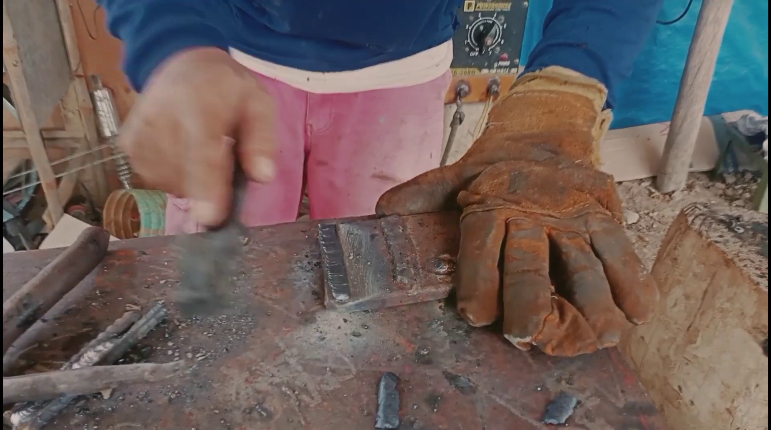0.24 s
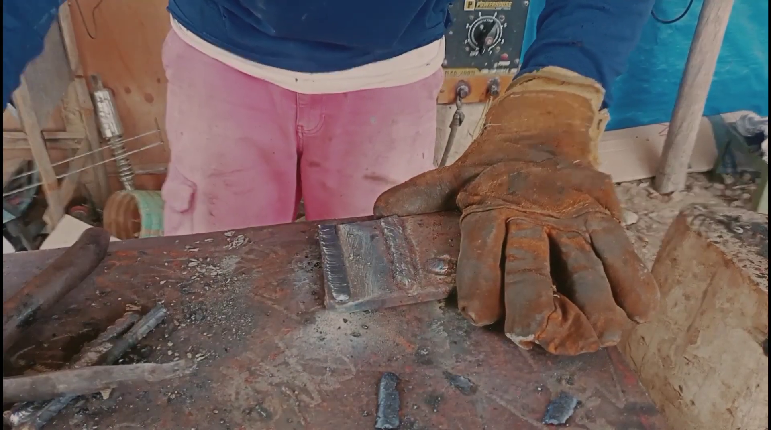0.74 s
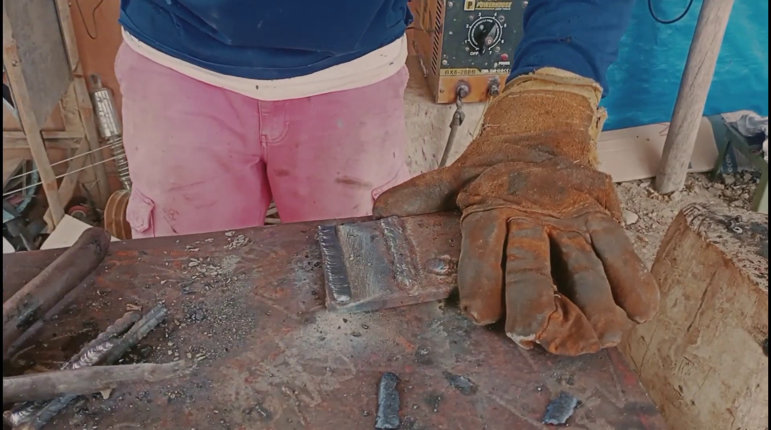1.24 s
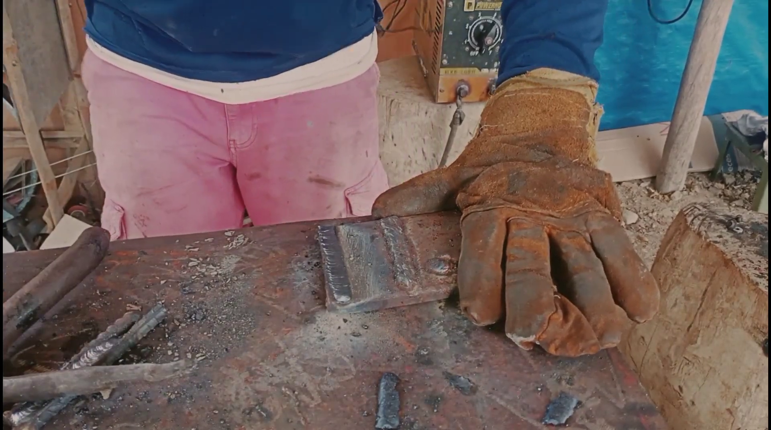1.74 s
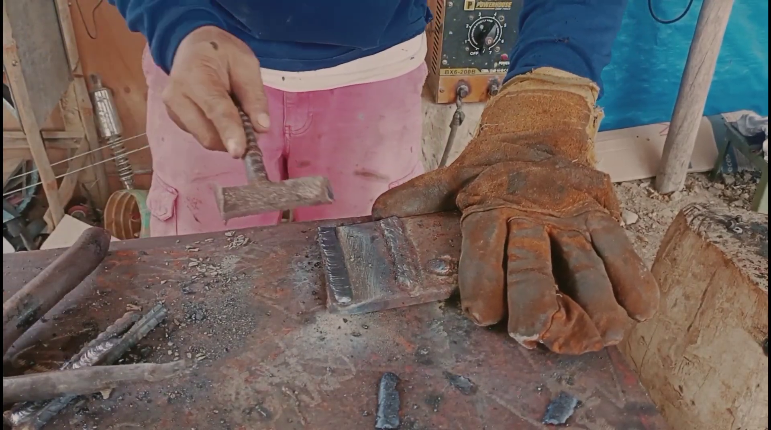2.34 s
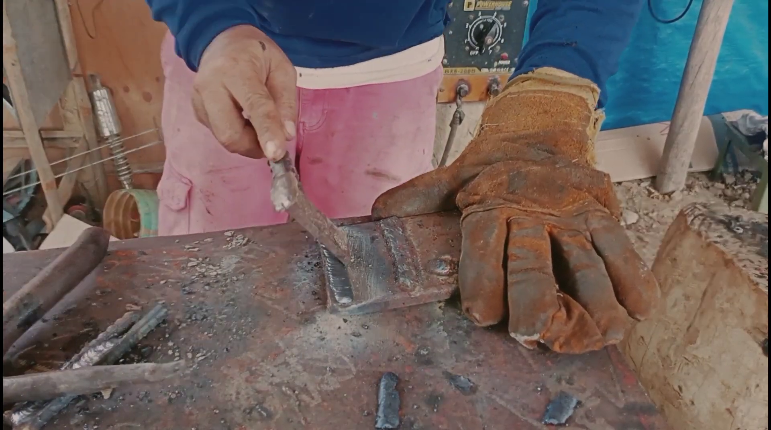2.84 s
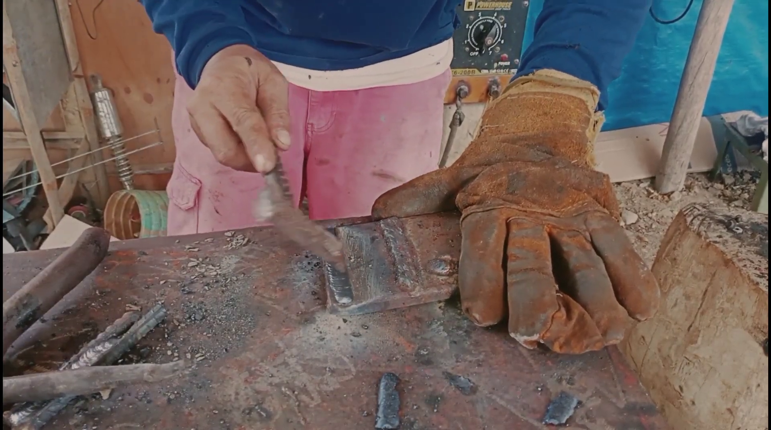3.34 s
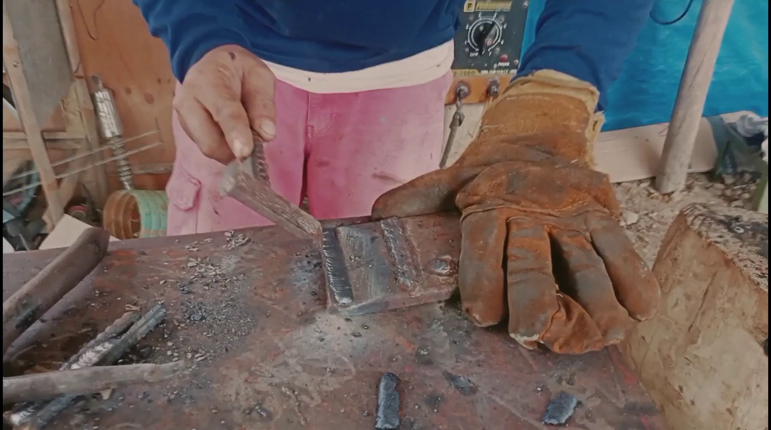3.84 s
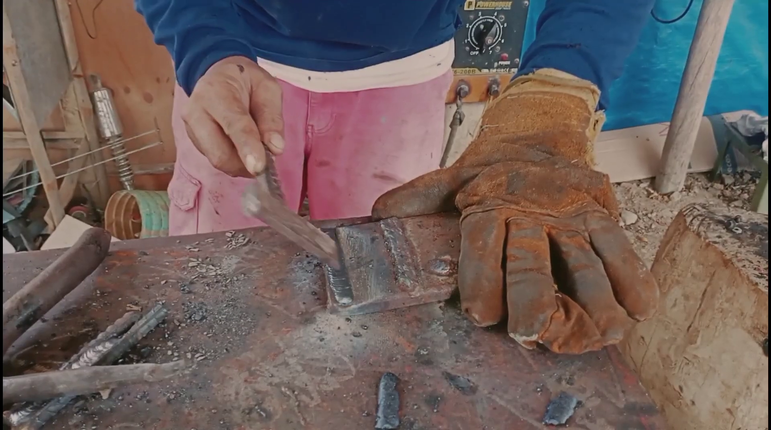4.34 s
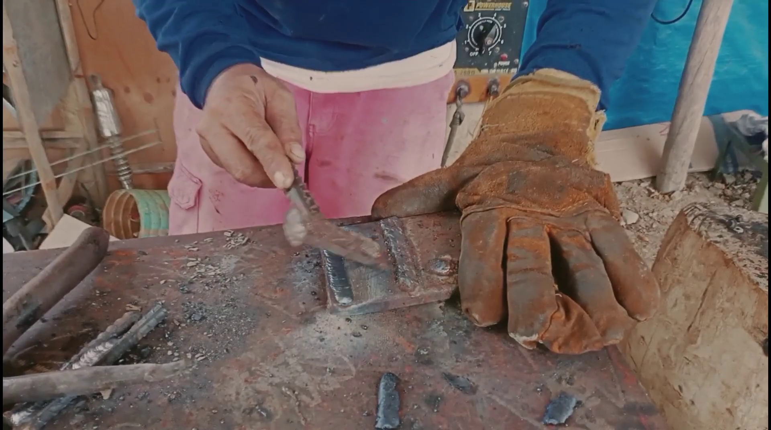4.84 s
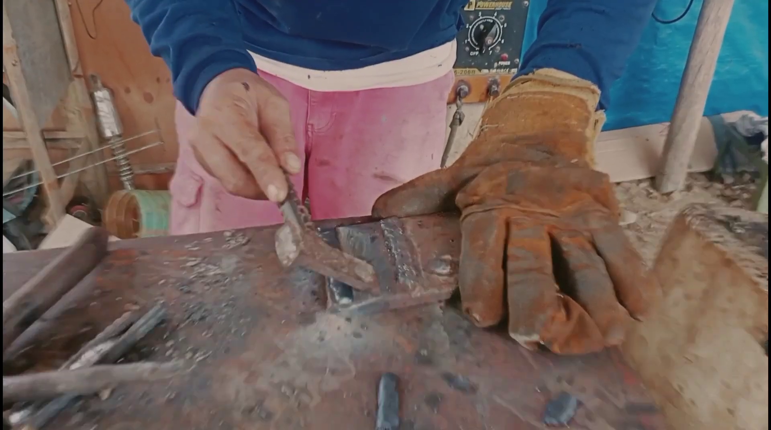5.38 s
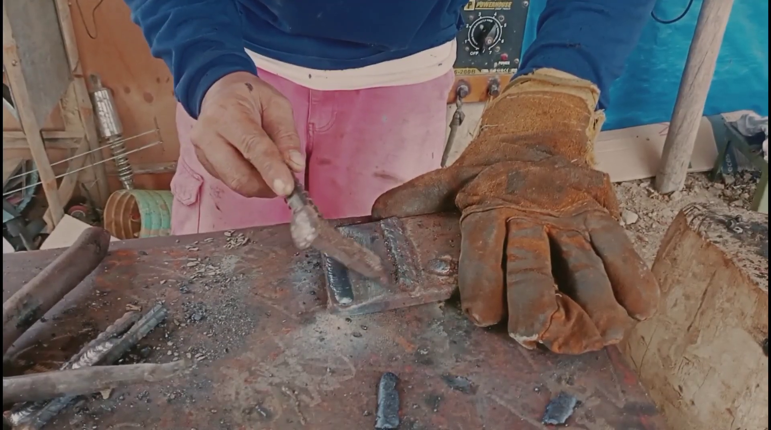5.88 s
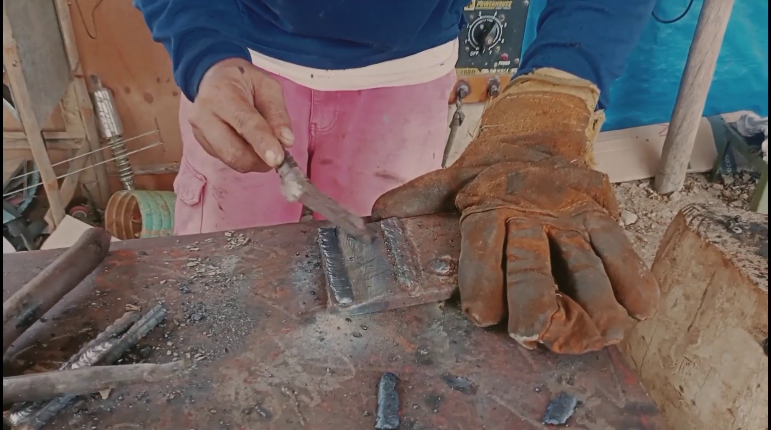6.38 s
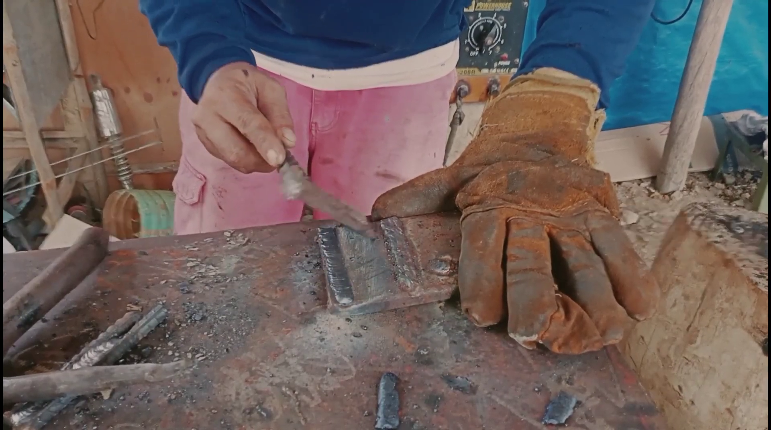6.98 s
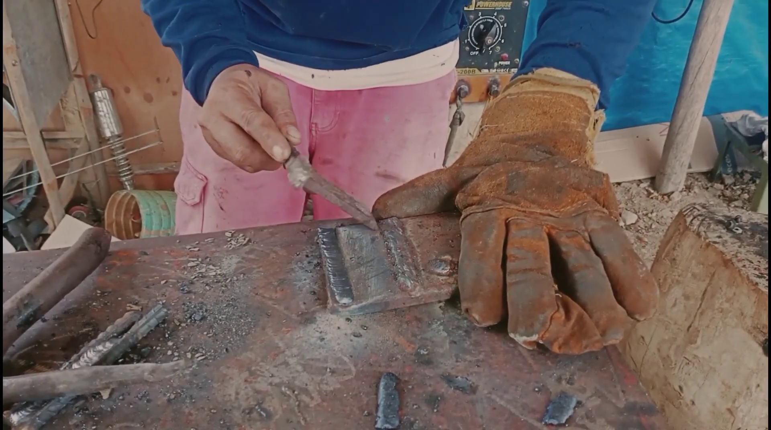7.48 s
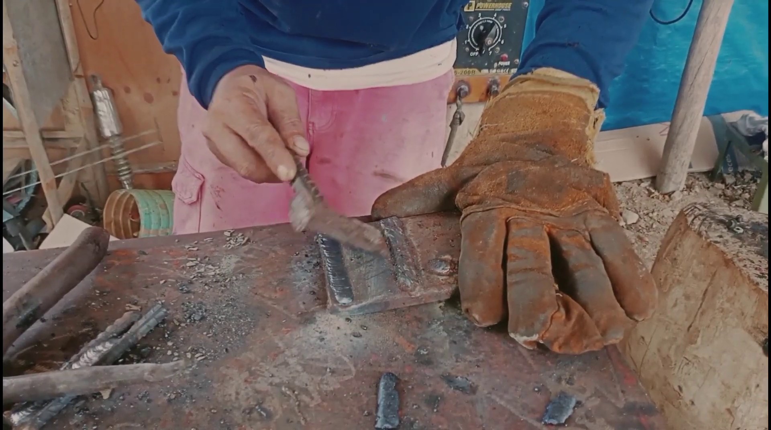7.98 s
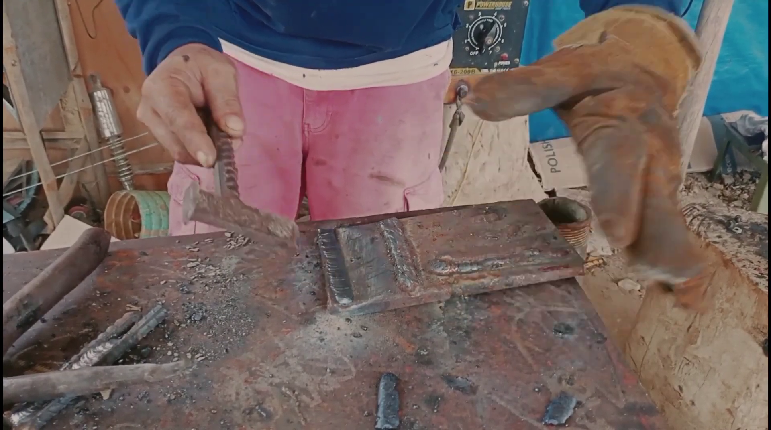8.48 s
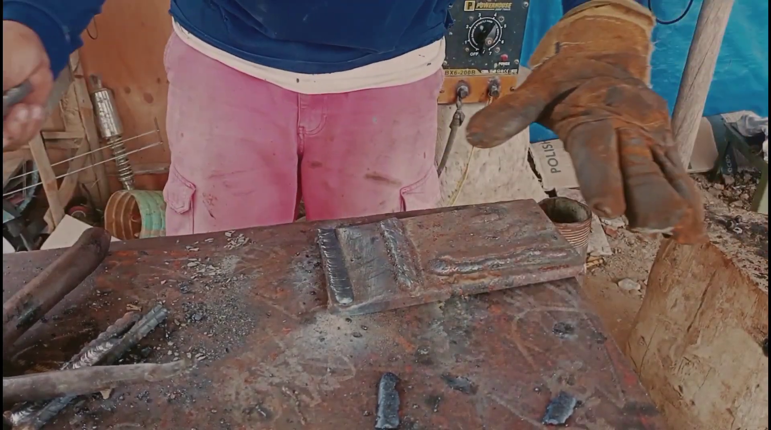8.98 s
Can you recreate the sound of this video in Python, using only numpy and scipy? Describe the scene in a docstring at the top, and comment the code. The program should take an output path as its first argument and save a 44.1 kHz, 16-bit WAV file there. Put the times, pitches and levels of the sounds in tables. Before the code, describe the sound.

A small hammer chips slag off a welded steel plate with bright short ringing taps and gritty scrapes, over a low workshop hum.

```python
"""An open workshop: a chipping hammer taps slag off a weld on a steel plate on a bench, then picks and scrapes.
Each blow rings the head's modes in two bending planes over a dead plate clack and a crack of slag, both noise bursts.
Random stick-slip jolts drive the scrapes and slides; damped knocks set tools down before and turn the plate after.
Behind lie a low wavering hum, coloured-noise air and faint falling bird whistles, all in mono."""
import sys
import numpy as np
from scipy import signal
from scipy.fft import rfft, irfft
from scipy.io import wavfile
from scipy.ndimage import uniform_filter1d, minimum_filter1d

SR = 44100
rng = np.random.default_rng(int(sys.argv[2]) if len(sys.argv) > 2 else 0)


def log_audio(samples):
    """Write samples as a 16-bit WAV file to the path given in sys.argv[1]."""
    # one column per channel
    frames = np.atleast_2d(samples).T
    # limit to full scale, then quantise
    limited = np.clip(frames, -1, 1)
    pcm = np.round(limited * 32767).astype(np.int16)
    wavfile.write(sys.argv[1], SR, pcm)


N = 406597
TIME = np.arange(N) / SR
AFTER = TIME[:SR * 3 // 5]  # seconds after a blow

# Hammer head bending modes. Each row: free pitch in Hz, relative level in dB, free t60 in seconds,
# share of sideways bending 0-1.
HEAD_MODES = [(2072.7, -1.5, 0.097, 0.02), (2119, -5.5, 0.043, 0), (2400, 0.5, 0.05, 1),
              (2474, -11.5, 0.045, .95), (2858, -17, 0.15, 0.26), (3180, -20, 0.17, 0.2),
              (3533, -14.5, 0.051, 0), (4280, -29, .08, 0.4), (4760, -22, 0.059, 0.9)]
# Hammer head high overtones. Each row: pitch in Hz, relative level in dB.
HEAD_OVERTONES = [(5265, -8), (5464, 0), (5937, -12), (6389, -4), (7218, -10), (8014, -11), (8340, -14),
                  (9520, -21), (9685, -19), (10720, -19), (11240, -17), (12500, -26), (14580, -16),
                  (14700, -20), (14900, -23), (15430, -23)]
# Colour of a dull bench knock. Each row: frequency in Hz, relative gain in dB.
KNOCK_COLOUR = [(70, -25), (140, -3), (210, 4), (270, -1.5), (370, 7.5), (520, 5.5), (750, 5), (1100, 1.5),
                (1700, -7.5), (2600, -26), (5000, -65)]


def amp(db):
    """Decibels to gain."""
    return 10 ** (np.asarray(db) / 20)


def unit(x):
    """Scale to rms 1."""
    return x / np.sqrt(np.mean(x ** 2))


def unit_hit(x):
    """Scale a blow as if its energy lay in 30 ms at rms 1."""
    return x / np.sqrt(np.sum(x ** 2) / (.03 * SR))


def add(out, start_s, x):
    """Mix x into out from start_s, or from 0 if that is negative."""
    i = max(int(start_s * SR), 0)
    out[i:i + len(x)] += x[:max(N - i, 0)]


def colour(x, points, size=2048):
    """Minimum-phase filter through the (Hz, dB) points, by folding the cepstrum."""
    hz, db = np.transpose(points)
    bin_hz = np.arange(size // 2 + 1) * SR / size
    outline_db = np.interp(np.log(bin_hz + 1), np.log(hz), db)
    cepstrum = irfft(np.log(amp(outline_db)))
    cepstrum[1:size // 2] *= 2
    cepstrum[size // 2 + 1:] = 0
    impulse = irfft(np.exp(rfft(cepstrum)))
    return signal.fftconvolve(x, impulse)[:len(x)]


def fade(t60_s):
    """Exponential decay after a blow, down 60 dB at t60_s."""
    return np.exp(-np.log(1000) * AFTER / t60_s)


def random_sign():
    """Random polarity of one mode."""
    return rng.choice([-1, 1])


def burst(points, t60_s, tick_db):
    """Contact tick on top of decaying noise, coloured together."""
    x = rng.standard_normal(len(AFTER)) * fade(t60_s)
    x[0] += amp(tick_db)
    return unit_hit(colour(x, points))


def walk(rate_hz):
    """Smooth random wander of rms 1: held random steps, averaged twice."""
    step = int(SR / rate_hz)
    held = np.repeat(rng.standard_normal(N // step + 1), step)
    smooth = uniform_filter1d(uniform_filter1d(held, step), step)
    return unit(smooth[:N])


def slips(rate_hz, spread_db):
    """Stick-slip: jolts at random times and polarities, a few much stronger."""
    size = amp(spread_db * np.minimum(rng.exponential(size=N), 4))
    return (rng.random(N) < rate_hz / SR) * size * rng.choice([-1, 1], N)


def strokes(rows, levels, pressure):
    """Summed stroke gains: the hand presses in, eases as it moves, then lifts off."""
    attack_s, sag_db_per_s, release_db_per_s = pressure
    gain = np.zeros(N)
    for (start_s, length_s, *_), level in zip(rows, levels):
        eased_db = sag_db_per_s * AFTER + release_db_per_s * np.maximum(AFTER - length_s, 0)
        add(gain, start_s, level * np.minimum(AFTER / attack_s, 1) * amp(-eased_db))
    return gain


def ring(x, hz, t60_s):
    """One decaying mode driven by x: a two-pole resonator with a zero at the top of the band."""
    pole = np.exp((2j * np.pi * hz - np.log(1000) / t60_s) / SR)
    return signal.lfilter([1, 1], [1, -2 * pole.real, abs(pole) ** 2], x)


def chatter(length_s, rebound_db, count=5):
    """Impulse of a blow and the few quick rebounds of the tip after it."""
    push = np.zeros(len(AFTER))
    push[0] = 1
    rebound_s = rng.uniform(.1, 1, count) * min(length_s, .1)
    push[(rebound_s * SR).astype(int)] += amp(rebound_db) * rng.standard_normal(count)
    return push


def plate(x, ring_db=-3, t60_s=0.046):
    """Gritty contact noise plus the short modal ring of loose steel."""
    # Each row: frequency in Hz, relative gain in dB.
    edge_colour = [(800, -22.5), (1700, 12), (3000, 2.5), (4200, -3.5), (6000, -14), (8000, -29.5),
                   (11000, -32), (15500, -28)]
    # Loose plate and tools on the bench. Each row: pitch in Hz, relative drive in dB.
    plate_modes = [(1650, 12), (2120, 0), (2460, -28), (2680, 3.5), (3000, 9.5), (3280, 0), (3810, -12)]
    modes = sum(amp(db) * ring(x, hz, t60_s) for hz, db in plate_modes)
    return unit(colour(x, edge_colour)) + amp(ring_db) * unit(modes)


def rubbed(jolts, points, resonance_db):
    """Jolts through a broad colour and the low resonances of the plate on its bench."""
    # Each row: pitch in Hz, relative level in dB, t60 in seconds.
    body_modes = [(318, -5, .09), (366.7, -3.5, 0.07), (441.4, -1.5, .08), (525, -8.5, 0.074),
                  (663, -1.5, 0.16), (730.5, -3, 0.098), (855, -5, 0.21), (1169, 1.5, 0.037),
                  (1453, -1, 0.053)]
    edges = np.diff(jolts, prepend=0)
    modes = sum(amp(db) * unit(ring(edges, hz, t60_s)) * random_sign() for hz, db, t60_s in body_modes)
    dulled = colour(modes, [(1000, 3), (2000, -14.5), (5000, -46.5)])
    return unit(unit(colour(jolts, points)) + amp(resonance_db) * unit(dulled))


def hum(db, width_hz, line_hz, line_db):
    """Narrow rumble, low-passed complex noise shifted to a wandering centre, plus a thin steady tone."""
    # Each row: time in seconds, centre in Hz, relative level in dB.
    hum_path = [(0, 119.8, -47), (.7, 118.8, -48.5), (1.598, 108.2, -38), (2.8, 123.6, -44),
                (4, 118.5, -43.5), (4.9, 136, -41), (5.8, 137.8, -37), (6.7, 140.3, -37.5),
                (7.6, 137.3, -38), (8.3, 137.2, -44.5), (9.2, 133.4, -35)]
    s, centre_hz, level_db = np.transpose(hum_path)
    noise = rng.standard_normal(N) + 1j * rng.standard_normal(N)
    spread = signal.sosfilt(signal.butter(2, width_hz / 2, fs=SR, output="sos"), noise)
    turns = np.cumsum(np.interp(TIME, s, centre_hz)) / SR
    rumble = unit((spread * np.exp(2j * np.pi * turns)).real)
    line = amp(line_db) * np.sin(2 * np.pi * line_hz * TIME)
    return amp(db + np.interp(TIME, s, level_db)) * rumble + line


def air(db):
    """Soft shop background: coloured noise, its level set above the hum and wandering slightly."""
    # Each row: frequency in Hz, relative gain in dB.
    shop_colour = [(25, -39), (50, -26.5), (85, -17), (125, 3.5), (250, -5.5), (450, -17.5), (1000, -18),
                   (2000, -23.5), (3200, -23.5), (4200, -28), (6300, -43), (8000, -52), (10000, -55.5),
                   (15500, -66)]
    shop_db = -50.5
    x = colour(rng.standard_normal(N), shop_colour, size=8192)
    above_hum = signal.sosfilt(signal.butter(4, 300, "high", fs=SR, output="sos"), x)
    return x / above_hum.std() * amp(shop_db + db + 0.2 * walk(1.9))


def slides(body_db, grit_db):
    """Steel juddering over crumbs of slag: jolts excite plate body and edge; now and then a crumb snaps."""
    # Brush, hammer and plate on the gritty bench. Each row: start in seconds, length in seconds,
    # relative body level in dB, relative grit level in dB.
    slide_rows = [(-.01, 0.042, -19, -31.5), (0.102, 0.015, -23, -58), (0.183, 0.088, -43, -53),
                  (0.908, 0.041, -37, -46), (0.975, 0.033, -22.5, -26.5), (1.097, 0.09, -33.5, -37),
                  (1.44, 0.39, -43.5, -44), (7.676, 0.052, -32.5, -61), (8.425, 0.21, -56, -50),
                  (8.859, .17, -19.5, -24.5), (9.051, 0.013, -29, -31), (9.148, 0.081, -29, -37)]
    # Attack in seconds, sag in dB per second, release in dB per second.
    slide_pressure = (0.004, 25, 212)
    # Each row: frequency in Hz, relative gain in dB.
    crumb_colour = [(1500, -11), (3000, 5), (6400, -5), (8000, -13), (11000, -19), (15500, -13)]
    crumbs_per_s, crumb_db = 41, -18  # level against the grit
    jolts = slips(rate_hz=2000, spread_db=3) * amp(1.5 * walk(110))
    _, _, low_db, high_db = np.transpose(slide_rows)
    body_gain = strokes(slide_rows, amp(low_db + body_db), slide_pressure)
    body = body_gain * rubbed(jolts, KNOCK_COLOUR, resonance_db=-3)
    crumbs = unit(colour(slips(rate_hz=crumbs_per_s, spread_db=2), crumb_colour))
    grit = unit(plate(jolts)) + amp(crumb_db) * crumbs
    return body + strokes(slide_rows, amp(high_db + grit_db), slide_pressure) * grit


def knocks(body_db, thud_db, edge_db, body_t60_s, thud_t60_s, edge_t60_s):
    """Steel set down on the bench: a damped noise clunk, one bench mode, a gritty edge and a plate clank."""
    # Each row: start in seconds, relative body level in dB, relative edge level in dB, thud pitch in Hz.
    knock_rows = [(0.029, -19, -24, 873), (0.114, -25.5, -30.5, 620), (0.956, -21, -37.5, 384),
                  (1.045, -25, -56, 494), (1.111, -28, -35, 353), (1.163, -29.5, -36, 525),
                  (1.27, -22, -32, 530), (1.311, -31, -40, 660), (7.178, -26.5, -42, 540),
                  (7.444, -16, -30.5, 207), (7.661, -23, -36, 479), (8.832, -25.5, -27.5, 370),
                  (8.837, -15.5, -24.5, 391), (9.11, -11.5, -16.5, 382)]
    # The one mode of the loose plate that rings on.
    clank_hz, clank_t60_s, clank_db = 3050, 0.17, -18
    out = np.zeros(N)
    for start_s, low_db, high_db, thud_hz in knock_rows:
        thud = unit_hit(fade(thud_t60_s) * np.cos(2 * np.pi * thud_hz * AFTER))
        thud *= np.minimum(AFTER * thud_hz, 1)  # rises over one period
        body = amp(body_db) * burst(KNOCK_COLOUR, body_t60_s, tick_db=17) + amp(thud_db) * thud
        edge = unit_hit(plate(rng.standard_normal(len(AFTER)) * fade(edge_t60_s)))
        clank = amp(clank_db) * unit_hit(fade(clank_t60_s) * np.sin(2 * np.pi * clank_hz * AFTER))
        add(out, start_s, amp(low_db) * body + amp(high_db + edge_db) * (edge + clank))
    return out


def bird(blur_t60_s):
    """Short quavering downward whistles, blurred by distance through a decaying noise echo."""
    # Each row: start in seconds, length in seconds, start pitch in Hz, end pitch in Hz (both before the
    # quaver), level in dB before the blur.
    chirp_rows = [(.31, .06, 4400, 2900, -54), (.41, .07, 5500, 4000, -58), (2.77, .07, 4400, 3100, -52),
                  (4.45, .08, 6000, 4400, -53)]
    out = np.zeros(N)
    for start_s, length_s, start_hz, end_hz, db in chirp_rows:
        hz = np.geomspace(start_hz, end_hz, int(length_s * SR))
        hz = hz * (1 + 0.033 * walk(360)[:len(hz)])
        whistle = np.sin(2 * np.pi * np.cumsum(hz) / SR)
        add(out, start_s, amp(db) * np.hanning(len(hz)) * whistle)
    echo = rng.standard_normal(len(AFTER)) * fade(blur_t60_s)
    return signal.fftconvolve(out, echo / np.linalg.norm(echo))[:N]


def taps(ring_db, clack_db, crack_db, overtone_db, clack_t60_s, crack_t60_s, overtone_t60_s):
    """Blows ring the head and clack the plate; firm ones crack more slag; the spot struck picks the overtones."""
    # Each row: start in seconds, then relative levels in dB of lengthwise ring, sideways ring,
    # plate clack and overtones.
    tap_rows = [(1.812, -14.5, -40, -25, -35.5), (1.903, -29, -44, -36.5, -55),
                (2.044, -27.5, -45, -31, -54), (2.245, -22, -38, -29.5, -49), (2.425, -17, -26, -26, -58),
                (2.632, -20.5, -30, -30.5, -54.5), (2.925, -12.5, -38, -18, -43),
                (3.185, -11, -29, -19.5, -34), (3.426, -15.5, -27, -20.5, -38.5),
                (3.634, -14.5, -24.5, -20.5, -35.5), (3.842, -16.5, -21.5, -20, -53),
                (4.073, -19.5, -19, -19, -37), (4.284, -20.5, -19, -21, -48), (4.632, -30, -17.5, -19, -36),
                (4.837, -21.5, -16, -18, -40.5), (5.022, -19, -21, -24, -55), (5.211, -29, -29.5, -36, -68),
                (5.228, -24.5, -27.5, -29.5, -63), (5.507, -15.5, -23, -28, -42),
                (5.738, -16, -24.5, -25.5, -40.5), (5.874, -41, -35, -49, -49),
                (6.0, -19.5, -25.5, -30, -47), (6.182, -15.5, -34, -24.5, -47),
                (6.204, -21.5, -23.5, -28, -45.5), (6.396, -21, -36, -34.5, -48),
                (6.622, -20, -22.5, -36, -42.5), (6.795, -46, -33.5, -51, -55), (7.584, -16, -26, -26, -42)]
    # Each row: frequency in Hz, relative gain in dB.
    clack_colour = [(70, -37.5), (130, -29.5), (190, 6.5), (270, -4), (420, 5.5), (700, 2), (1150, 3),
                    (1700, 0.5), (2400, -8), (3500, -34), (6000, -50.5)]
    # Each row: frequency in Hz, relative gain in dB.
    crack_colour = [(1500, -8), (2300, 2.5), (3100, 5.5), (4000, -3), (5200, -3), (6500, -23), (8500, -26),
                    (10000, -42.5), (13000, -47), (15500, -38)]
    # dB of slag crack per dB of plate clack; the row level at which the two are equal.
    slag_growth, firm_blow_db = 1.68, -20
    # The head rings freely for one bounce; as the tip lands again the ring drops.
    flight_s, landing_s, landing_db = 0.017, 0.012, -10
    out = np.zeros(N)
    landing = amp(landing_db * np.clip((AFTER - flight_s) / landing_s, 0, 1))
    contact = np.minimum(AFTER / 0.0013, 1)  # the force builds up over the time of contact
    for start_s, length_db, side_db, plate_db, high_db in tap_rows:
        push = chatter(length_s=.02, rebound_db=-12.0)
        slag_db = firm_blow_db + slag_growth * (plate_db - firm_blow_db)
        x = amp(plate_db + clack_db) * burst(clack_colour, clack_t60_s, tick_db=27.5)
        x += amp(slag_db + crack_db) * burst(crack_colour, crack_t60_s, tick_db=22)
        for hz, db, t60_s, side in HEAD_MODES:
            grip = 1 + 0.0017 * rng.standard_normal()  # hand and contact detune the head a little
            mode = unit_hit(landing * ring(push, hz * grip, t60_s)) * random_sign()
            plane_db = (1 - side) * length_db + side * side_db
            x += amp(db + ring_db + plane_db) * mode
        shimmer = np.zeros(len(AFTER))
        for hz, db in HEAD_OVERTONES:
            gain = amp(db + 4.5 * rng.standard_normal())
            shimmer += gain * unit(ring(push, hz, overtone_t60_s)) * random_sign()
        add(out, start_s, contact * (x + amp(high_db + overtone_db) * unit_hit(shimmer)))
    return out


def scrapes(grit_db, ring_db, overtone_db, bench_db):
    """The tip catches on weld ripples; jolts shake plate and bench and ring the head in the plane it leans to."""
    # Strokes along the seam. Each row: start in seconds, length in seconds, relative grit level in dB,
    # relative ring level in dB, sideways lean 0-1.
    scrape_rows = [(1.924, 0.028, -35.5, -31, .15), (2.009, .03, -35.5, -60, 0.3),
                   (2.035, 0.023, -16.5, -17, 0.07), (2.153, 0.051, -28, -20, 0.37),
                   (2.244, 0.019, -16.5, -13, 0.34), (2.326, .07, -42, -44, 0.3),
                   (2.457, 0.059, -23.5, -31, .15), (2.675, 0.018, -17.5, -21, 0.3),
                   (3.871, 0.043, -23, -28, 0.8), (5.041, .065, -25, -31, 0.9), (5.158, 0.1, -33, -38, 0.9),
                   (5.279, .05, -25, -18.5, 0.41), (5.339, 0.058, -36, -43, 0.6),
                   (5.54, 0.032, -24, -14.5, 0.56), (5.76, 0.028, -23.5, -25, 0.8),
                   (5.924, .095, -30, -21.5, 0.27), (6.229, 0.033, -27.5, -27, 0.9),
                   (6.417, .08, -27.5, -15.5, 0.64), (6.659, 0.067, -26.5, -18, .6),
                   (6.794, 0.059, -41, -35, 0.6), (6.882, 0.087, -30.5, -26, 0.56),
                   (7.005, 0.18, -32.5, -32, 0.27), (7.204, .135, -29.5, -29.5, 0.27),
                   (7.363, 0.097, -29.5, -24.5, 0.59), (7.517, 0.053, -26.5, -22, .9)]
    # Attack in seconds, sag in dB per second, release in dB per second.
    scrape_pressure = (0.01, 10, 414)
    # Each row: frequency in Hz, relative gain in dB.
    grit_colour = [(100, -23.5), (220, 5.5), (300, 4.5), (450, 8.5), (700, 7), (1100, 3.5), (1700, 1.5),
                   (3000, -4), (4200, -18.5), (6000, -50), (8500, -74), (15000, -81)]
    # A tip pressed on the plate shortens and sharpens the ring of the head.
    pressed_t60_share, pressed_pitch_rise = 0.92, 0.0041
    # Hard strokes boom the bench; both growths are dB per dB of grit.
    bench_hz, bench_t60_s, bench_growth = 222.5, 0.068, 1.44
    overtone_growth = 0.56
    jolts = slips(rate_hz=1400, spread_db=3) * amp(2.5 * walk(60))
    _, _, rub_db, head_db, lean = np.transpose(scrape_rows)
    lean = np.clip(lean, 0, 1)

    def press(levels):
        """Hand pressure over all strokes at these gains."""
        return strokes(scrape_rows, levels, scrape_pressure)

    out = press(amp(rub_db + grit_db)) * rubbed(jolts, grit_colour, resonance_db=-3)
    boom = unit(ring(np.diff(jolts, prepend=0), bench_hz, bench_t60_s))
    out += press(amp(bench_growth * rub_db + bench_db)) * boom
    for hz, db, t60_s, side in HEAD_MODES:
        pressed = ring(jolts, hz * (1 + pressed_pitch_rise), t60_s * pressed_t60_share)
        mode = unit(pressed) * random_sign()
        plane = (1 - side) * (1 - lean) + side * lean
        out += press(amp(db + head_db + ring_db) * plane) * mode
    shimmer = np.zeros(N)
    for hz, db in HEAD_OVERTONES:
        # the moving point of contact favours now one overtone, now another
        favoured = jolts * amp(5 * walk(30))
        shimmer += amp(db) * unit(ring(favoured, hz, t60_s=.07)) * random_sign()
    return out + press(amp(overtone_growth * rub_db + overtone_db)) * unit(shimmer)


def room(x, early_db, early_t60_s, late_db, late_t60_s):
    """Decaying noise tail: quick reflections from the near walls and a weak longer decay."""
    decay = amp(early_db) * fade(early_t60_s) + amp(late_db) * fade(late_t60_s)
    tail = rng.standard_normal(len(AFTER)) * decay
    tail *= np.clip(AFTER / .012 - .5, 0, 1)  # opens from 6 to 18 ms
    return x + signal.fftconvolve(x, tail)[:N]


def limit(x, ceiling, hold_s):
    """Look-ahead limiter: turns the gain down smoothly around peaks over the ceiling."""
    size = int(hold_s * SR)
    gain = ceiling / np.maximum(abs(x).max(axis=0), ceiling)
    return x * uniform_filter1d(minimum_filter1d(gain, size), size)


def scene():
    """Work at the bench in its room, over the background, alike in both channels."""
    background = hum(db=-1.8, width_hz=43.6, line_hz=367, line_db=-60) + air(db=-1.0)
    work = slides(body_db=-3.0, grit_db=-3.0)
    work += knocks(body_db=-4.0, thud_db=-8.5, edge_db=0.0,
                   body_t60_s=0.14, thud_t60_s=0.11, edge_t60_s=0.13)
    background += bird(blur_t60_s=0.17)
    work += taps(ring_db=1, clack_db=1.48, crack_db=-2.5, overtone_db=-1.5,
                 clack_t60_s=0.18, crack_t60_s=0.13, overtone_t60_s=0.078)
    work += scrapes(grit_db=-3.0, ring_db=-5, overtone_db=-36.5, bench_db=-4.5)
    mono = background + room(work, early_db=-37.5, early_t60_s=0.19, late_db=-53.5, late_t60_s=0.51)
    return np.array([mono, mono])


def record(dry):
    """Trim the deep bass, limit the loudest peaks, cut the top."""
    top_hz = 15700
    trimmed = signal.sosfilt(signal.butter(2, 55, "high", fs=SR, output="sos"), dry)
    held = limit(trimmed, ceiling=.87, hold_s=.002)
    return signal.sosfilt(signal.ellip(8, .2, 70, top_hz, fs=SR, output="sos"), held)


dry = scene()
out = record(dry)
log_audio(out)
```